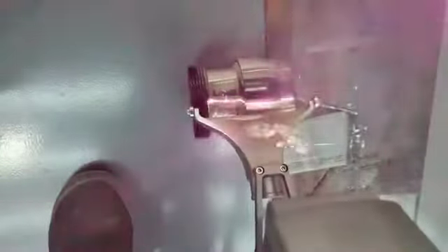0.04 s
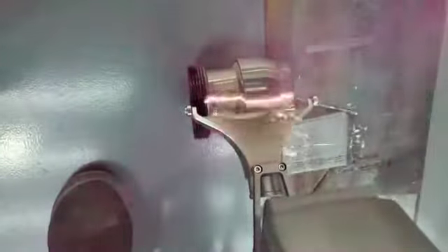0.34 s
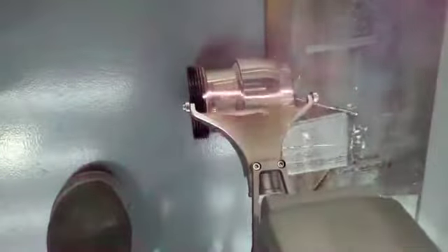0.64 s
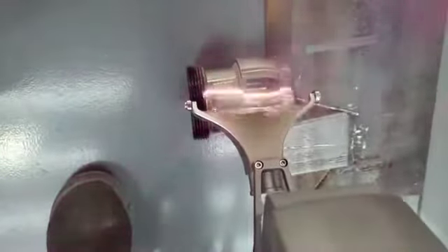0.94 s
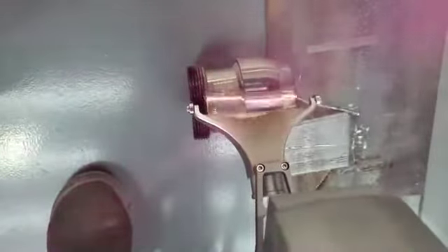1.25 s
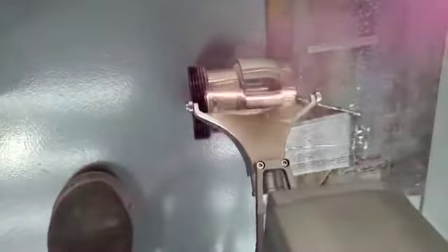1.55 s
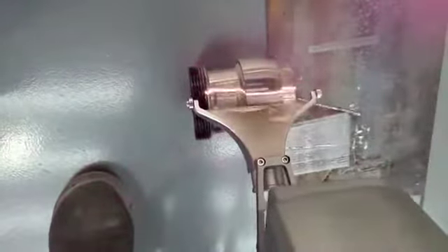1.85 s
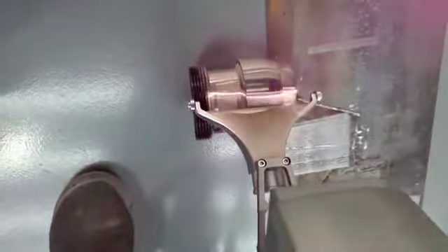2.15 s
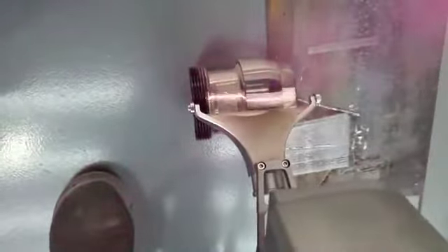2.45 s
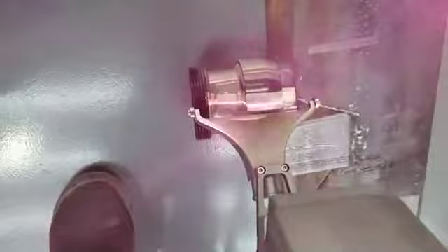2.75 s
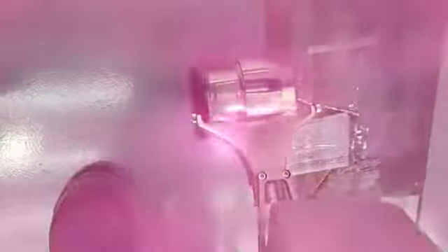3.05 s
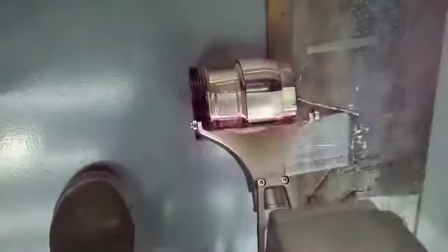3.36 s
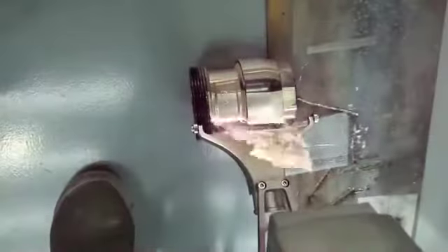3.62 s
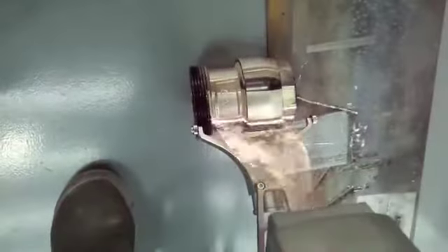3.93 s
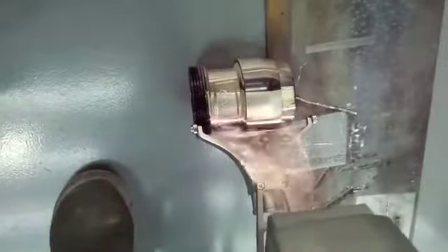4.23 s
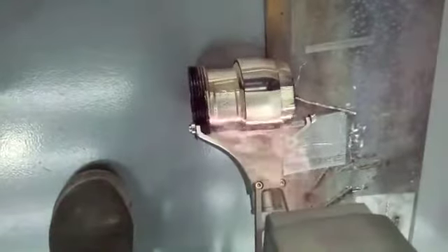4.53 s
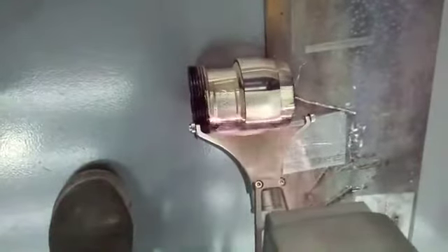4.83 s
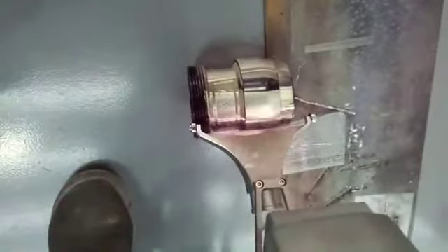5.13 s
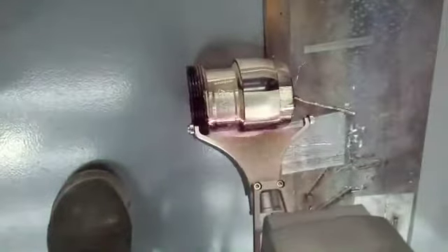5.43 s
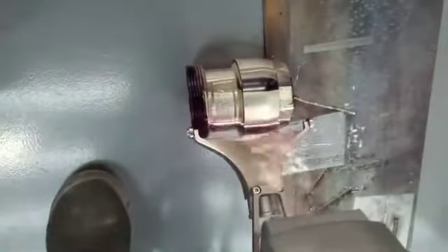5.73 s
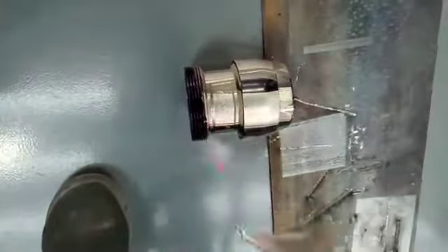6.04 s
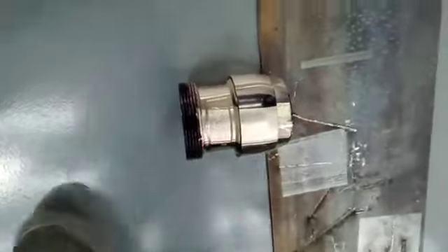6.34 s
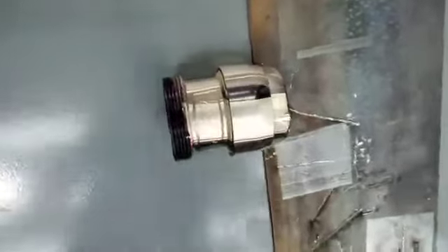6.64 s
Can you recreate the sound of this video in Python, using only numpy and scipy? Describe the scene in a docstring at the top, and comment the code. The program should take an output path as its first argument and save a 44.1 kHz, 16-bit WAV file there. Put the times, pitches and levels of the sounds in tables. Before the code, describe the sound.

A handheld laser cleaner strips a metal fitting with a bright, buzzing hiss that flutters unevenly in strength. Small dull pops of dirt flaking off come early, midway and near the end. The trigger is released with a sharp snap and the hiss stops at once, followed by a softer click. Fans rumble and motors hum behind it in a faintly ringing workshop, with the tool close to the microphone.

```python
"""A handheld laser cleaner hisses as it strips a metal fitting. The beam sweeps a line about 73 times
a second and crosses the same grain and edges each time, so the hiss of its vapour plume buzzes.
Flakes of dirt pop off; the trigger is let go with a snap and the hiss stops.
Behind it, in a faintly ringing workshop, fans rumble, motors hum and an inverter whines."""
import sys
import numpy as np
from scipy import signal
from scipy.fft import rfft, irfft
from scipy.io import wavfile
from scipy.ndimage import uniform_filter1d, map_coordinates

SR = 44100
rng = np.random.default_rng(int(sys.argv[2]) if len(sys.argv) > 2 else 0)


def pcm_store(signal):
    """Save signal as 16-bit PCM."""
    levels = np.round(np.clip(np.atleast_2d(signal), -1, 1) * 32767)
    wavfile.write(sys.argv[1], SR, levels.astype(np.int16).T)


N = 303408
TIME = np.arange(N) / SR
HZ = np.fft.rfftfreq(N, 1 / SR)
SWEEP_HZ = 73.45


def amp(db):
    """Decibels to gain."""
    return 10 ** (np.asarray(db) / 20)


def unit(x):
    """Scales to rms 1."""
    return x / np.sqrt(np.mean(x ** 2) + 1e-20)


def steady(x, size=4200):
    """Holds a stereo pair near rms 1, leaving the quick flutter."""
    power = uniform_filter1d(np.mean(x ** 2, axis=0), size)
    return x / np.sqrt(abs(power) + 1e-20)


def at_hz(rows, column=1):
    """One table column over log frequency."""
    rows = np.array(rows)
    return np.interp(np.log(HZ + 1), np.log(rows[:, 0]), rows[:, column])


def curves(rows):
    """Table columns over time."""
    time_s, *columns = np.transpose(rows)
    return [np.interp(TIME, time_s, column) for column in columns]


def wander(hz):
    """Random drift below hz, rms 1."""
    return unit(irfft(rfft(rng.standard_normal(N)) / (1 + (HZ / hz) ** 4), N))


def random_path(spread, knots):
    """Straight lines between evenly spaced random values."""
    return np.interp(TIME, np.linspace(0, TIME[-1], knots), spread * rng.standard_normal(knots))


def add(mix, start_s, sound):
    """Mixes a sound in at start_s."""
    part = mix[round(start_s * SR):][:len(sound)]
    part += sound[:len(part)]


def echoes(t60_s, size=8000):
    """Spectrum of bench and wall reflections: sparse dying taps, energy 1."""
    t = TIME[:size]
    taps = rng.standard_normal(size) * (rng.random(size) < .15)
    taps *= (t > .0006) * amp(-60 * t / t60_s)
    return rfft(taps / np.linalg.norm(taps), N)


def tones(rows, waver_rad, waver_hz, swell_db, swell_hz):
    """Sines wavering in phase and level."""
    out = np.zeros(N)
    for hz, db in rows:
        gain = np.sqrt(2) * amp(db + swell_db * wander(swell_hz))
        out += gain * np.sin(2 * np.pi * (hz * TIME + rng.random()) + waver_rad * wander(waver_hz))
    return out


# Fan noise: freq_hz, density_db
FAN_SPECTRUM = [(25, -30), (69, -7), (93, -7), (125, -6.5), (207, -3), (394, -9.5), (515, -15.5),
                (1090, -26.5), (1500, -26), (3090, -36.5), (7000, -51.5), (11200, -59), (13800, -41),
                (15000, -58)]
# Fan likeness, left to right: freq_hz, coherence
FAN_COHERENCE = [(60, 0.95), (120, 1), (250, 0.81), (500, 0.63), (1000, 0.27), (4000, 0.036)]
# Motor hum: pitch_hz, relative_db
MOTOR_HUM = [(49, -19.5), (100, -9.5), (148, -11.5), (181, -12.5), (229, -14.5), (346, -18.5), (390, -18)]
# Fans and hum together: time_s, gain_db
MACHINE_GAIN = [(0, -40.5), (2, -40.5), (3.4, -37), (4.3, -39), (5.5, -39.5), (6.2, -37), (6.88, -37.5)]


def machines(fans_db=-1.24, left_db=.62, left_lag_s=.00025):
    """Fan rumble and motor hum, reaching the right side first."""
    left, stray = rfft(rng.standard_normal((2, N)))
    coherence = at_hz(FAN_COHERENCE)
    right = coherence * left + np.sqrt(1 - coherence ** 2) * stray
    colour = amp(at_hz(FAN_SPECTRUM)) / (1 + (36 / (HZ + 1)) ** 4)
    fans = unit(irfft(np.array([left, right]) * colour, N))
    hum = tones(MOTOR_HUM, waver_rad=.39, waver_hz=2, swell_db=1.7, swell_hz=.8)
    out = amp(curves(MACHINE_GAIN)[0]) * (amp(fans_db) * fans + hum)
    out[0] = amp(left_db) * np.interp(TIME - left_lag_s, TIME, out[0])
    return out


# Inverter whine: pitch_hz, relative_db
WHINE_TONES = [(13081, -20), (13752, 0), (14411, -14)]
# Standing waves along the listener's path: time_s, gain_db
WHINE_GAIN = [(0, -56), (2.5, -48), (4.2, -68), (5.9, -54), (6.55, -61), (6.73, -51.5), (6.88, -53)]


def inverter(left_phase_rad=2):
    """A thin whine that swells and fades as the listener moves through its standing waves."""
    whine = tones(WHINE_TONES, waver_rad=.8, waver_hz=12, swell_db=2.6, swell_hz=12)
    phases = np.array([[np.exp(1j * left_phase_rad)], [1]])
    return amp(curves(WHINE_GAIN)[0]) * irfft(rfft(whine) * phases, N)


def puff(hz, body):
    """One pressure swing centred 1 ms in; a slower rebound gives it body."""
    angle = 2 * np.pi * hz * (TIME[:200] - .001)
    swing = 1 / (1 - .7j * angle) ** 2
    rebound = body / (1 - .3j * (angle - 8)) ** 2
    return (np.exp(2j * np.pi * rng.random()) * (swing - rebound)).real


# Hand piece clicks, trigger first: start_s, level_db, pitch_hz, ring_relative_db
GRIP_CLICKS = [(5.8385, -13.5, 2000, 5.5), (6.001, -22, 1040, -28)]
# Hand piece modes: pitch_hz, relative_db, t60_s
GRIP_MODES = [(1680, -6, .035), (2570, -5, .012), (2830, 1, .019), (3070, -6, .016), (3260, -15, .08),
              (3600, 0, .018), (4000, -2, .024), (4750, -8, .015), (5650, -9, .015), (6500, -4, .02)]


def trigger(left_db=-7, wet=.48):
    """Sharp blows ring the hand piece briefly; the left hears only reflections."""
    out, t = np.zeros(N), TIME[:6000]
    ring = sum(amp(db - 60 * t / t60_s) * np.sin(2 * np.pi * hz * t) for hz, db, t60_s in GRIP_MODES)
    ring /= abs(ring).max()
    for start_s, level_db, pitch_hz, ring_db in GRIP_CLICKS:
        add(out, start_s, amp(level_db + ring_db) * ring)
        add(out, start_s - .001, amp(level_db) * puff(pitch_hz, body=.1))
    paths = np.array([amp(left_db) * echoes(.042), 1 + wet * echoes(.036)])
    return irfft(rfft(out) * paths, N)


# Larger flakes: start_s, level_db
FLAKE_POPS = [(0.17, -11.5), (0.227, -12.5), (0.276, -15.5), (0.371, -15.5), (0.377, -16), (0.398, -12.5),
              (0.405, -16), (0.563, -8.5), (0.604, -16), (0.642, -19), (0.683, -15), (1.022, -18),
              (3.59, -14), (3.603, -13.5), (3.619, -15), (3.741, -16), (3.754, -15.5), (5.529, -18),
              (5.543, -16), (5.562, -10.5), (5.567, -5.5), (5.571, -15), (5.576, -7), (5.617, -5.5),
              (5.622, -17), (5.63, -7.5), (5.644, -12.5), (5.658, -20), (5.671, -17)]


def flakes(gain_db=-1.3, left_db=-19, base_hz=1540, hz_per_db=24, dull_hz=4300):
    """Dirt blasts off in dull pops, mostly on the right; bigger flakes are louder and lower."""
    out = np.zeros(N)
    for start_s, level_db in FLAKE_POPS:
        pitch_hz = base_hz - hz_per_db * level_db
        add(out, start_s - .001, amp(level_db + gain_db) * puff(pitch_hz, body=.2))
    dulled = rfft(out) / (1 + (HZ / dull_hz) ** 8)
    paths = np.array([amp(left_db) * echoes(.025), 1 + .25 * echoes(.008)])
    return irfft(dulled * paths, N)


def bounces(hiss, delays_s=(.0008, .0035), sway_s=.00012, gain=.26, above_hz=1700, count=10):
    """Fitting, nozzle and bench reflect the hiss; the hand sways the paths, shifting the resonances."""
    bright = signal.sosfilt(signal.butter(2, above_hz, "high", fs=SR, output="sos"), hiss)
    out = hiss.copy()
    for delay_s in rng.uniform(*delays_s, count):
        sent_s = TIME - delay_s - random_path(sway_s, knots=30)
        out += gain * np.array([np.interp(sent_s, TIME, channel) for channel in bright])
    return out


def surface(life_sweeps, shape):
    """Random roughness, one row a sweep, burnt away over about life_sweeps."""
    surviving = np.exp(-1 / life_sweeps)
    return unit(signal.lfilter([1], [1, -surviving], rng.standard_normal(shape), axis=0))


def vapour(place, grain_sweeps=1.4, edge_sweeps=9, patchy_db=3, edge_db=6, creep=.0263, edge_count=9):
    """Two spectra of vapour puffs: fine grain, and kicks where the beam crosses creeping edges."""
    rows, spots = int(N / SR * SWEEP_HZ) + 6, 600
    patches = unit(uniform_filter1d(surface(edge_sweeps, (rows, spots)), 40, axis=1))
    specks = surface(grain_sweeps, (rows, spots)) * amp(patchy_db * patches)
    grain = map_coordinates(specks.ravel(), [place * spots], order=3, mode="wrap")
    edges, near = np.zeros(N), np.arange(-4, 5)
    for edge in range(edge_count):
        passes = place + (edge + rng.random()) / edge_count + random_path(creep, knots=14)
        crossed = np.flatnonzero(np.diff(np.floor(passes)) > 0)
        late_samples = (passes[crossed + 1] % 1) * SR / SWEEP_HZ
        kicks = rng.choice([-1, 1]) * amp(edge_db * np.tanh(surface(edge_sweeps, rows)))
        pulses = kicks[:len(crossed), None] * np.sinc(near + late_samples[:, None])
        np.add.at(edges, (crossed[:, None] + near) % N, pulses)
    return rfft(np.array([unit(grain), unit(edges)]))


# Hiss colour: freq_hz, left_db, right_db
HISS_SPECTRUM = [(800, -19.3, -15), (1090, -14.5, -12.5), (1460, -11, -5.3), (1640, -12.5, -10.5),
                 (2174, -6, -2.2), (2400, -12.5, -10), (2610, -3.6, -3.6), (3100, -2, -3.3), (3590, -6, -4),
                 (4200, -11, -4.3), (5500, -13, -4.8), (6530, -12.5, -5.5), (7300, -14.5, -14),
                 (8540, -9.5, -8), (9950, -8, -5.3), (12400, -5.3, -3), (14700, -3.3, -1.3)]
# Direct sound bending round to the shaded left: freq_hz, share, lag_rad
LEFT_DIFFRACTION = [(700, .8, .5), (1000, 0.75, 0.65), (1190, 0.66, 1.95), (1490, 0.9, 1.12),
                    (1680, 0.56, 1.15), (2090, 0.66, 1.85), (2400, 0.2, 1.76), (2650, 0.62, 2.18),
                    (2980, .9, 3.04), (3375, .82, 3.2), (3730, 0.35, 4.3), (4150, 0, 5.5), (9000, 0, 7.4),
                    (15100, 0.22, 12.8)]


def plume(place, hollow, hollow_hz=3150, half_width_hz=450):
    """Left and right plume spectra: the left gets the direct sound late, mixed with stray sound."""
    direct, stray = vapour(place), vapour(place)  # a different pattern radiates each way
    opposed_band = np.exp(-((HZ - hollow_hz) / half_width_hz) ** 4)  # left and right in antiphase
    stray = stray - rfft(irfft(stray * opposed_band, N) * hollow)
    share, lag_rad = at_hz(LEFT_DIFFRACTION, 1), at_hz(LEFT_DIFFRACTION, 2)
    left = share * np.exp(-1j * lag_rad) * direct + np.sqrt(1 - share ** 2) * stray
    pair = np.array([left * amp(at_hz(HISS_SPECTRUM, 1)), direct * amp(at_hz(HISS_SPECTRUM, 2))])
    return pair / (1 + (350 / (HZ + 1)) ** 4)


# Sweep overtones: harmonic, relative_db
TURN_OVERTONES = [(13, -12), (14, -18), (15, -20), (16, -18), (18, -15.5), (19, -15.5), (20, -14.5),
                  (21, -18)]


def beam_turns(mirror, left_db=-6):
    """Steady overtones from the beam reversing at the ends of its line."""
    overtones = sum(amp(db) * np.cos(2 * np.pi * (harmonic * mirror + rng.random()))
                    for harmonic, db in TURN_OVERTONES)
    return amp([[left_db], [0]]) * np.sqrt(2) * overtones


# Beam bite as the hand moves over the metal: time_s, level_db
BITE_LEVEL = [(0.0, -39.9), (0.045, -39.3), (0.109, -44.5), (0.163, -39.3), (0.218, -39), (0.245, -42),
              (0.444, -40), (0.472, -47), (0.508, -49), (0.553, -39.5), (0.753, -44.5), (0.862, -38),
              (0.907, -42.5), (0.943, -38.5), (0.998, -41), (1.034, -39.5), (1.134, -45), (1.206, -40.5),
              (1.342, -42.5), (1.397, -39), (1.533, -44.5), (1.642, -38), (1.714, -48), (1.77, -41.5),
              (1.86, -40.5), (1.923, -43.5), (2.025, -37.8), (2.059, -50.5), (2.077, -38), (2.095, -40),
              (2.141, -48), (2.168, -40.5), (2.313, -41), (2.34, -43.4), (2.367, -39.5), (2.458, -43.5),
              (2.531, -38.5), (2.612, -48.5), (2.685, -39.5), (2.776, -41), (2.803, -48), (2.848, -39.3),
              (2.875, -41.5), (2.957, -44.5), (2.993, -40.7), (3.093, -43), (3.156, -50), (3.184, -41.4),
              (3.211, -45.5), (3.256, -44.5), (3.41, -48), (3.483, -41.5), (3.528, -47.5), (3.556, -48.1),
              (3.592, -43.5), (3.628, -43.2), (3.701, -39.0), (3.873, -43), (4.127, -43), (4.372, -40.5),
              (4.44, -45), (4.5, -40), (4.553, -38.5), (4.653, -40), (4.689, -41.5), (4.726, -39),
              (4.753, -40.5), (4.78, -50), (4.825, -44.5), (4.862, -51), (4.88, -44), (4.961, -39.5),
              (5.079, -43), (5.116, -48), (5.152, -43), (5.179, -50.3), (5.228, -42.5), (5.297, -42),
              (5.342, -47.5), (5.433, -44), (5.469, -50.2), (5.569, -37.5), (5.615, -42), (5.696, -41),
              (5.723, -43), (5.769, -40.5), (5.823, -40.5)]
# Single sweeps grazing the rim: centre_s, rise_db
RIM_SPITS = [(3.1755, 9), (3.189, 8.5), (3.203, 4), (3.245, 9.5), (5.118, 5), (5.131, 4), (5.145, 5),
             (5.158, 6)]


def bite_db(spit_s=.0067, lull_db=4, lull_s=.021):
    """Hiss level; grazing the rim gathers a sweep into a short spit with a lull around it."""
    level_db = curves(BITE_LEVEL)[0]
    for centre_s, rise_db in RIM_SPITS:
        level_db += rise_db * np.exp(-(2 * (TIME - centre_s) / spit_s) ** 4)
        level_db -= lull_db * np.exp(-(2 * (TIME - centre_s) / lull_s) ** 2)
    return level_db


# Where the beam bites hardest as the hand slides: time_s, offset_sweeps
HOT_SPOT_PATH = [(0, .97), (1.35, .62), (3.3, .19), (4.7, .14), (5.8, 0)]
# Colour along the metal: time_s, buzz_db, sizzle_db, fizz_db, turns_db, hollow_share
METAL_COLOUR = [(0, -10.5, -1, 4.5, -4, .1), (0.35, -8.5, -1, 4.6, 1, 0), (0.55, -10, -1.5, 4.2, 2, 0),
                (0.95, -10.5, -.4, 4, 2, 0.13), (1.2, -8.5, -1.3, 4.9, 3, 0.37), (1.7, -9.5, -1, 4.7, 2, 0),
                (2.15, -10.5, -1.3, 5, 0, 0), (2.45, -12, -.5, 4.7, -3, 0), (2.75, -9.5, -.3, 5, -4, 0),
                (2.95, -10.5, 0, 5, -4, 0.15), (3.2, -9, -1, 4.9, -3, 0), (3.45, -8, -1.5, 6.6, -1, 0),
                (3.7, -7.5, -2, 5.8, 5, 0.94), (4.0, -8.5, -1.6, 5.7, 5.5, 0.95),
                (4.35, -9.5, -2, 5.8, 3, 0.85), (4.6, -7.5, .5, 5.2, 0, .8), (5.0, -9, -.4, 5.5, -2, 0.6),
                (5.35, -13.5, -1, 5.2, -2, .2), (5.56, -6, 0.3, 4.4, 0, .2), (5.82, -12.5, -1, 6, -2, 0.48)]
# Unevenness of the line on the metal: time_s, depth_factor
THROB_DEPTH = [(0, 1.2), (.35, .5), (.9, .55), (1.3, 1.1), (1.8, .75), (2.3, 1), (2.75, 1.8), (3.1, 1.2),
               (3.5, .6), (4.1, 1.2), (4.65, 1.8), (5, 1.3), (5.35, .6), (5.8, .8)]
# Level swing within a sweep at depth 1: buzz_db, sizzle_db, rasp_db, fizz_db
BAND_THROB = (3.6, 3.2, 1, 1.4)


def laser(off_s=5.85, fade_s=.007, flutter_db=1.1, flutter_hz=45, tremor_db=.7, tremor_hz=14):
    """The plume hisses in four bands, throbbing because one part of the swept line bites harder."""
    mirror = SWEEP_HZ * TIME + 2 + .015 * wander(.91)  # in sweeps
    place = mirror - curves(HOT_SPOT_PATH)[0]
    buzz_db, sizzle_db, fizz_db, turns_db, hollow = curves(METAL_COLOUR)
    throb = curves(THROB_DEPTH)[0] * np.cos(2 * np.pi * place)
    grain, edges = plume(place, hollow).swapaxes(0, 1)
    # buzz, sizzle, rasp, fizz
    tops_hz, edge_gains = (1750, 3800, 7400, 15600), (.9, .4, .33, .42)
    levels_db = (buzz_db - .8, sizzle_db - 1.4, -2, fizz_db - .8)
    bands = np.diff([1 / (1 + (HZ / hz) ** 30) for hz in tops_hz], axis=0, prepend=0)
    hiss = np.zeros((2, N))
    for band, edge_gain, throb_db, level_db in zip(bands, edge_gains, BAND_THROB, levels_db):
        noise = irfft((grain + edge_gain * edges) * band, N)
        focus_db = tremor_db * wander(tremor_hz)  # the hand trembles in and out of focus
        hiss += amp(level_db + focus_db) * steady(noise * amp(throb * throb_db))
    turns = amp(buzz_db + turns_db) * beam_turns(mirror)
    beam_on = np.clip((off_s - TIME) / fade_s + .5, 0, 1)
    return (bounces(hiss) + turns) * amp(bite_db() + flutter_db * wander(flutter_hz)) * beam_on


def scene(room_db=-16, room_t60_s=.55, room_hz=9000):
    """The tool, its faint ring in the room, and the workshop machines."""
    tool = laser() + flakes() + trigger()
    walls = np.array([echoes(room_t60_s, size=20000) for _ in range(2)])
    room = irfft(rfft(tool) * walls / (1 + (HZ / room_hz) ** 2), N)
    return tool + amp(room_db) * room + machines() + inverter()


def record(dry, cutoff_hz=15100):
    """Steep low-pass on the top treble."""
    lowpass = signal.firwin(511, cutoff_hz, window=("kaiser", 9), fs=SR)
    return signal.oaconvolve(dry, lowpass[None], "same")


dry = scene()
out = record(dry)
pcm_store(out)
```